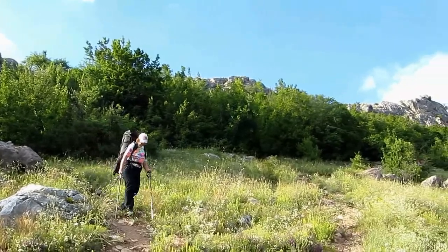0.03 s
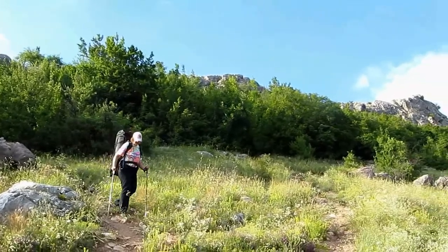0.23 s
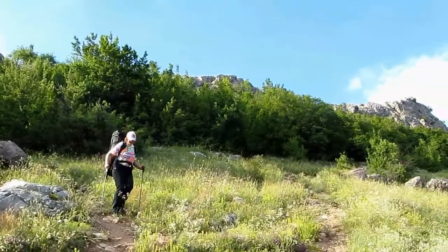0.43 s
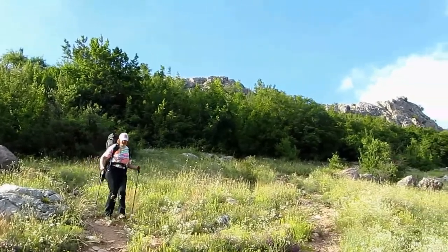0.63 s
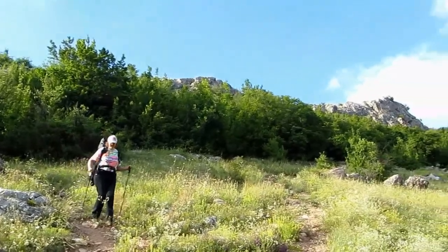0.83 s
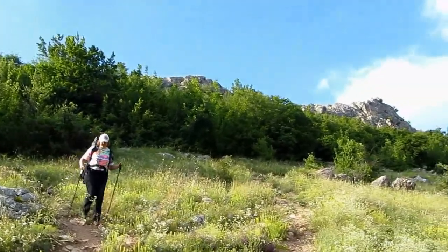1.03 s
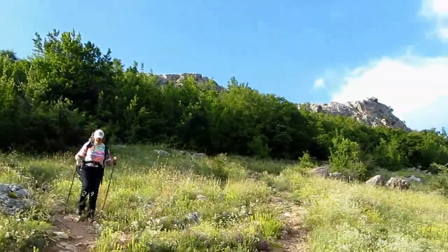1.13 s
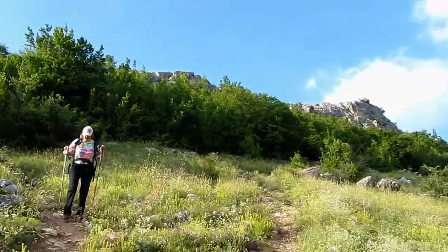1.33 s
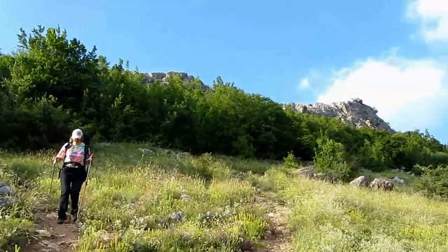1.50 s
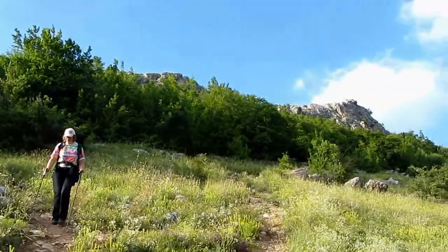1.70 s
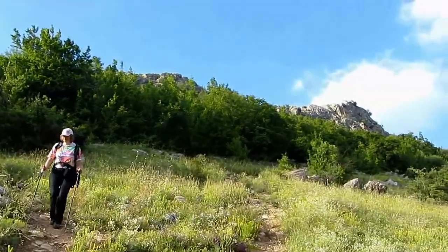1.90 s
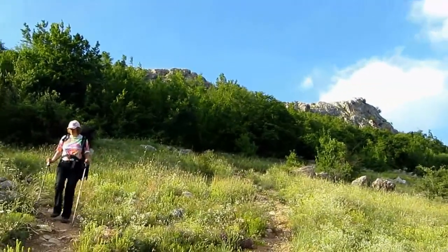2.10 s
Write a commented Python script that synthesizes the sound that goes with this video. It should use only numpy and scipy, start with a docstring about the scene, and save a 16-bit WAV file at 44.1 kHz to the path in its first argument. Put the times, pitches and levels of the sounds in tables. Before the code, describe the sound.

Close to the microphone, a hiker's metal pole tip clacks on rock, followed by uneven steps with stone knocks, gravel crunches and clicking pebbles. Faint, regular cricket chirps and a soft breeze fill the open meadow throughout.

```python
"""A hiker on a stony path, close to the stereo microphone and slightly left, in a mountain meadow.
A metal pole tip strikes rock and rebounds; boots knock on bedded stones, thump on earth and crunch
gravel, and pebbles clack together. Nearby, straight ahead, a field cricket chirps by scraping its wings.
Slope and wood return a faint echo. Dry stalks tick, and behind it all lies a wide, soft hush of air
in grass and trees."""
import sys
import numpy as np
from scipy import signal
from scipy.fft import rfft, irfft, next_fast_len
from scipy.io import wavfile
from scipy.ndimage import uniform_filter1d

SR = 44100
rng = np.random.default_rng(int(sys.argv[2]) if len(sys.argv) > 2 else 0)


def to_wav(sig):
    """Store sig (one row per channel, or 1-D mono) as 16-bit WAV at the path in sys.argv[1].

    Samples outside -1..1 are clipped; the rate is SR.
    """
    pcm = np.clip(np.atleast_2d(sig), -1, 1) * 32767
    pcm = np.round(pcm).astype(np.int16)
    wavfile.write(sys.argv[1], SR, pcm.T)  # frames by channels


N = 94815
T = np.arange(N) / SR
AGE = T[:N // 16]  # time since the start of a short sound
FREQS = np.maximum(np.arange(2049) * SR / 4096, 1)

# pole tip on rock: t/s, level/dB, tilt/(dB/octave), chatter decay/s, chatter/dB, shaft f/Hz, shaft/dB
POLE_STRIKES = [(0.2306, 1, .5, .003, 1.5, 8780, -35), (0.235, -4, -3, 0.0034, 22, 9000, -54),
                (0.2696, -17, 3, .003, 7, 9200, -62), (0.2756, -6.5, 3.5, 0.0075, 18, 8460, -33)]
# modes of tip and rock: f/Hz, t60/s, level/dB
TIP_ROCK_MODES = [(524, 0.044, -21), (756, 0.044, 4), (970, 0.015, -1.5), (1418, 0.032, 9),
                  (2360, .03, -17), (2667, 0.036, 4), (2940, 0.06, 3), (3500, 0.02, -3), (4530, 0.032, -9),
                  (5840, 0.053, -1), (7900, .02, -16)]
# spectrum of the tip's crack: f/Hz, level/dB
CRACK_SPECTRUM = [(60, -57), (200, -20), (500, -7.5), (1200, -2), (2000, -0.5), (3200, 7), (5000, 0),
                  (7000, -8), (11000, -5), (16000, -26)]
# boots on bedded stones: t/s, level/dB, f/Hz, grit against knock/dB
BOOT_KNOCKS = [(0.207, -29, 230, -18), (.8356, -5.5, 561, -4), (1.179, -23, 560, -12),
               (1.406, -32, 218, -12), (1.674, -24, 650, -11), (1.776, -23.5, 320, -16),
               (1.802, -21, 423, 0), (1.882, -20, 527, -23)]
# modes of a bedded stone: ratio to the knock's pitch, t60/s, level/dB
STONE_MODES = [(.62, 0.028, -6.5), (.82, 0.021, -2.5), (1, 0.015, -1.5), (1.36, 0.026, -3.5)]
# spectrum of grit between sole and stone: f/Hz, level/dB
GRIT_SPECTRUM = [(60, -35), (200, -12), (500, -8.5), (1400, 1.5), (2000, -1), (2600, 3), (3500, -13),
                 (7000, -17), (16000, -44)]
# pebbles colliding: t/s, level/dB, tilt/(dB/octave)
PEBBLE_CLACKS = [(0.343, -31, -0.5), (1.2, -25.5, 0.5), (1.336, -29.5, -4.5), (1.459, -27, -6),
                 (1.616, -24.5, 0), (1.681, -21.5, 1), (1.7005, -6.5, 1.5), (1.72, -24, -3),
                 (1.738, -21.5, 0.5)]
# modes of a pebble: f/Hz, t60/s, level/dB
CLACK_MODES = [(1213, 0.044, -1.5), (1870, 0.01, 1.5), (2270, .014, -26), (3070, .01, 8.5),
               (3580, 0.0075, 7), (4280, 0.0055, -24), (5740, 0.0063, -14), (7860, 0.0061, -29),
               (9300, .005, -10), (10700, .005, -7)]
# gravel shifting under a sole: t/s, level/dB, decay/s, tilt/(dB/octave)
GRAVEL_CRUNCHES = [(.004, -17, 0.024, 0), (0.379, -25, 0.016, 6), (1.029, -15, 0.0075, 2.5),
                   (1.049, -21.5, 0.018, 7), (1.081, -16.5, 0.0032, -0.5), (1.504, -13.5, .005, 0),
                   (1.512, -19.5, 0.016, 2), (1.776, -12, 0.0093, 1.5), (1.792, -21.5, .006, 7),
                   (1.801, -10.5, .003, -1.5), (1.8061, -9.5, 0.011, -3), (1.834, -20, 0.008, 0)]
# spectrum of gravel: f/Hz, level/dB
GRAVEL_SPECTRUM = [(60, -29), (200, -16), (500, -12), (1200, -7.5), (2000, 1), (3300, 3.5), (5000, -2.5),
                   (7000, -7), (11000, -8), (16000, -32.5)]
# boots on bare earth: t/s, level/dB
EARTH_THUMPS = [(.205, -26), (0.286, -32), (1.396, -33), (1.671, -34.5), (1.825, -30)]
# spectrum of a thump on soil: f/Hz, level/dB
EARTH_SPECTRUM = [(30, -3), (70, -7.5), (150, 0), (260, -1), (500, -12), (2000, -40), (16000, -62)]
# cricket chirps: first loud stroke t/s, gap to the second/s, gap on to the third/s, level/dB
CRICKET_CHIRPS = [(.102, .028, .040, -43), (.535, 0.025, 0.037, -42), (.783, .028, 0.034, -42.5),
                  (1.025, .032, 0.03, -42.5), (1.276, 0.028, 0.031, -43), (1.553, .032, 0.027, -43),
                  (1.779, 0.029, 0.03, -44.5), (2.043, 0.03, .034, -42.5)]
# spectrum of the wing file's rasp: f/Hz, level/dB
RASP_SPECTRUM = [(2000, -34), (3800, -19), (4800, 9), (5300, 5), (6000, -13), (10000, -15), (16000, -36)]
# spectrum of the hush common to both channels: f/Hz, level/dB
HUSH_MID_SPECTRUM = [(15, -40), (25, 5), (114, -10), (326, -1.5), (516, -3.5), (754, -0.5), (988, -2),
                     (1100, -2.5), (1330, 0.5), (1480, -2.5), (1840, -3), (3340, -8), (4250, -8.5),
                     (16000, -23)]
# spectrum of the hush opposed in the two channels: f/Hz, level/dB
HUSH_SIDE_SPECTRUM = [(15, -49), (25, -5), (84, -5.5), (223, -4), (317, -3.5), (575, -5), (659, -1),
                      (775, -2), (1160, -4), (1610, -6.5), (1940, -8), (3080, -12), (7110, -20),
                      (16000, -32)]
# slow rise and fall of the hush: t/s, level/dB
HUSH_SWELL = [(0, -1), (.3, 1.5), (.5, 0.5), (.9, 2), (1.3, -.5), (1.8, 2.5), (2.0, -1.5), (2.15, -1.5)]


def pole(crack_db=7, shaft_t60_s=0.095, shaft_split_hz=53):
    """Close by, the tip cracks on rock and chatters; the shaft rings on in a high, beating pair of tones."""
    out, body = np.zeros((2, N)), ring(TIP_ROCK_MODES)
    for start, db, tilt_db, decay, chatter_db, shaft_hz, shaft_db in POLE_STRIKES:
        clink = unit(through(body, colour([(300, 0), (9000, 0)], tilt_db)))
        crack = undb(crack_db) * colour(CRACK_SPECTRUM, tilt_db)
        add(out, start, undb(db) * through(contact(decay, chatter_db), unit(clink + crack)))
        shaft = np.sin(2 * np.pi * shaft_hz * AGE)
        shaft += .5 * np.sin(2 * np.pi * (shaft_hz + shaft_split_hz) * AGE)
        add(out, start, undb(shaft_db) * shaft * fade(AGE, shaft_t60_s))
    return out


def boots(roll_s=0.0035):
    """A sole knocks a stone in its bed and rolls on: a short hollow note with some grit."""
    out, grit = np.zeros((2, N)), colour(GRIT_SPECTRUM)
    for start, db, hz, grit_db in BOOT_KNOCKS:
        body = ring([(hz * ratio, t60, mode_db) for ratio, t60, mode_db in STONE_MODES])
        add(out, start, undb(db) * through(contact(roll_s, chatter_db=-3.5), body))
        add(out, start, undb(db + grit_db) * through(contact(roll_s, chatter_db=22), grit))
    return out


def pebbles(ring_db=-0.5):
    """Small stones collide underfoot with a dry crack and a short bright ring."""
    out, body = np.zeros((2, N)), ring(CLACK_MODES)
    for start, db, tilt_db in PEBBLE_CLACKS:
        ringing = through(contact(decay_s=0.0018, chatter_db=-2.5), body)
        crack = through(contact(decay_s=0.0036, chatter_db=9), colour(GRAVEL_SPECTRUM, tilt_db))
        add(out, start, undb(db) * (crack + undb(ring_db) * ringing))
    return out


def gravel():
    """Showers of grit as weight comes on to a sole."""
    out = np.zeros((2, N))
    for start, db, decay, tilt_db in GRAVEL_CRUNCHES:
        shower = contact(decay, chatter_db=28.5, grain_db=1.5)
        add(out, start, undb(db) * through(shower, colour(GRAVEL_SPECTRUM, tilt_db)))
    return out


def earth(decay_s=0.0065):
    """Soft, dull thumps of weight on the bare soil of the path."""
    out = np.zeros((2, N))
    for start, db in EARTH_THUMPS:
        add(out, start, undb(db) * through(contact(decay_s, chatter_db=27), colour(EARTH_SPECTRUM)))
    return out


def cricket(wing_hz=5256, lead_hz=4900, lead_s=.026, lead_db=-10.5, spread_hz=30, spread_db=0.44):
    """Ahead of the microphone, each chirp is a soft, scratchy, lower stroke and three loud ones."""
    song, half_span = np.zeros(N), AGE.mean()
    for first, gap1, gap2, db in CRICKET_CHIRPS:
        add(song, first - lead_s - half_span, undb(db + lead_db) * wing_stroke(lead_hz, rasp_db=-9))
        for centre in np.cumsum([first, gap1, gap2]):
            pitch, force = rng.standard_normal(2)
            stroke = wing_stroke(wing_hz + spread_hz * pitch, rasp_db=-14.5)
            add(song, centre - half_span, undb(db + spread_db * force) * stroke)
    song *= 1 + 0.18 * wander(rate_hz=700)  # roughens the tone
    return song + echo(song, db=-13)


def wing_stroke(hz, rasp_db, half_length_s=0.00546, sag_hz=198, octave_db=-22):
    """A tone swells and fades inside a longer rasp, its pitch arching with the speed of the wing's file."""
    travel = (AGE - AGE.mean()) / (half_length_s * np.exp(0.17 * rng.standard_normal()))  # 0 mid-stroke
    phase = 2 * np.pi * np.cumsum(hz - sag_hz * np.minimum(travel ** 2, 3)) / SR
    tone = np.exp(-np.abs(travel) ** 3) * (np.sin(phase) + undb(octave_db) * np.sin(2 * phase))
    rasp = through(rng.standard_normal(len(AGE)), colour(RASP_SPECTRUM))
    return tone + undb(rasp_db) * rasp * np.exp(-(travel / 2.15) ** 2)


def grass(ticks_per_s=16, db=-41):
    """Sparse, faint ticks of dry stalks and grit along the path."""
    ticks = (rng.random(N) < ticks_per_s / SR) * rng.uniform(.3, 1, N)
    snap = through(contact(decay_s=0.001, chatter_db=20), colour(GRAVEL_SPECTRUM, tilt_db=8.0))
    return undb(db) * through(ticks, snap)


def echo(x, db, t60_s=0.28, rise_s=0.0025):
    """Faint, dull scatter from the slope and the edge of the wood."""
    t = T[:N // 5]
    tail = rng.standard_normal((2, len(t))) * fade(t, t60_s) * (1 - np.exp(-t / rise_s))
    dull = colour([(200, 4), (1500, 1.5), (5000, -0.5), (14000, -17)])
    return undb(db) * through(x, unit(through(tail, dull)))


def hush(mid_db=-54, side_db=-46.5, flicker_db=1.12):
    """Air in grass and trees, far back and all round the microphone, its level gently flickering."""
    mid, side = (
        undb(db + flicker_db * wander(rate_hz=17.9)) * through(rng.standard_normal(N), colour(spectrum))
        for spectrum, db in ((HUSH_MID_SPECTRUM, mid_db), (HUSH_SIDE_SPECTRUM, side_db)))
    swell = undb(np.interp(T, *np.array(HUSH_SWELL).T))
    return np.array([mid + side, mid - side]) * swell


def contact(decay_s, chatter_db, grain_db=2, width=0.44):
    """A sharp first touch, then a dying shower of tiny ones, scattered left and right."""
    grains = rng.standard_normal((2, len(AGE)))
    grains *= undb(grain_db * np.minimum(rng.exponential(size=len(AGE)), 4))
    shower = grains[0] + width * grains[1] * np.array([[1], [-1]])
    push = undb(chatter_db) * unit(shower * np.exp(-AGE / decay_s))
    push[:, 0] += 1  # the first touch
    return unit(push)


def ring(modes, low_cut_hz=152):
    """Response of damped modes (f/Hz, t60/s, level/dB); small bodies radiate little bass."""
    t = T[:len(FREQS) - 1]
    motion = sum(undb(db) * unit(np.sin(2 * np.pi * hz * t) * fade(t, t60)) * (-1) ** (k // 2)
                 for k, (hz, t60, db) in enumerate(modes))
    return unit(signal.lfilter(*signal.butter(2, low_cut_hz, "high", fs=SR), motion))


def colour(points, tilt_db=0):
    """Causal response with a spectrum of (f/Hz, level/dB) points and a tilt per octave."""
    hz, db = np.array(points).T
    curve = np.interp(np.log(FREQS), np.log(hz), db) + tilt_db * np.log2(np.maximum(FREQS, hz[0]))
    half = len(FREQS) - 1
    cepstrum = irfft(np.log(undb(curve)))[:half]
    cepstrum[1:] *= 2  # minimum phase keeps the attack sharp
    return unit(irfft(np.exp(rfft(cepstrum, 2 * half)))[:half])


def wander(rate_hz):
    """Smooth random drift with a spread near one."""
    hold = max(int(SR / rate_hz), 2)
    steps = np.repeat(rng.standard_normal(N // hold + 1), hold)
    return uniform_filter1d(uniform_filter1d(steps, hold), hold)[:N] * np.sqrt(2)


def through(x, response):
    """Pass a sound through an impulse response."""
    size = next_fast_len(x.shape[-1] + response.shape[-1], True)
    return irfft(rfft(x, size) * rfft(response, size), size)[..., :x.shape[-1]]


def fade(t, t60):
    """Exponential decay, 60 dB down at t60."""
    return np.exp(-np.log(1000) * t / t60)


def undb(db):
    """Decibels to gain."""
    return 10 ** (np.asarray(db) / 20)


def unit(x):
    """Scale to a mean energy of one per channel."""
    return x / np.sqrt(np.mean(np.sum(x ** 2, axis=-1)) + 1e-18)


def add(out, start, x):
    """Mix a short sound in at its time."""
    i = int(np.clip(start * SR, 0, N - 1))
    out[..., i:i + x.shape[-1]] += x[..., :N - i]


def scene():
    """From the microphone: the hiker slightly left, the cricket ahead, the meadow all round."""
    lag_s, pan_db = .00004, 1.6  # the steps reach the right channel later and softer
    left, right = pole() + boots() + earth() + pebbles() + gravel() + grass()
    right = np.roll(right, round(lag_s * SR))
    path = np.array([left * undb(pan_db / 2), right * undb(-pan_db / 2)])
    return path + echo(left, db=-19) + cricket() + hush()


def record(dry):
    """The recorder drops the deepest bass and cuts the top steeply."""
    low_cut_hz, top_hz = 47, 16000
    thin = signal.sosfilt(signal.butter(4, low_cut_hz, "high", fs=SR, output="sos"), dry)
    return signal.sosfilt(signal.ellip(10, .2, 70, top_hz, fs=SR, output="sos"), thin)


dry = scene()
out = record(dry)
to_wav(out)
```